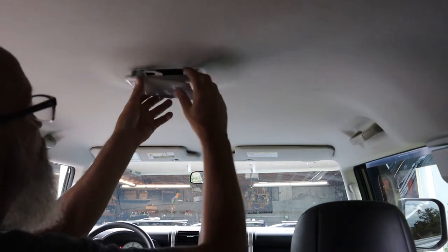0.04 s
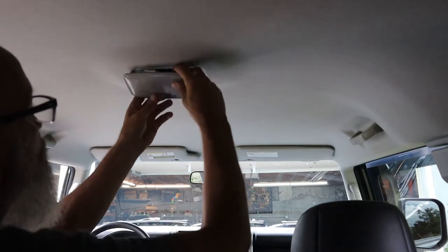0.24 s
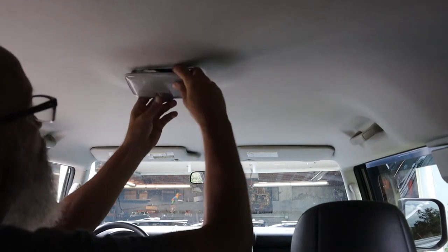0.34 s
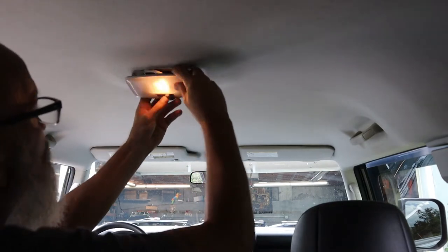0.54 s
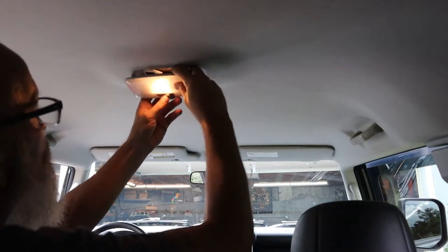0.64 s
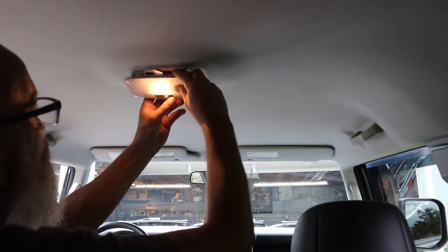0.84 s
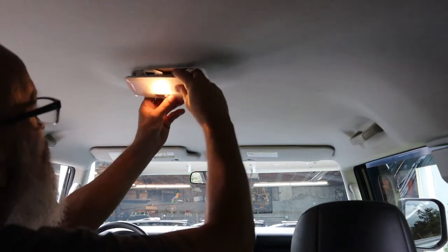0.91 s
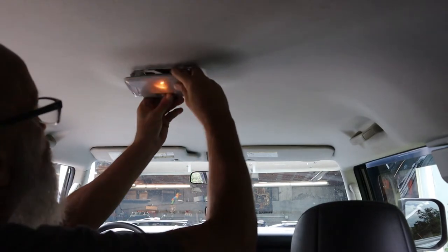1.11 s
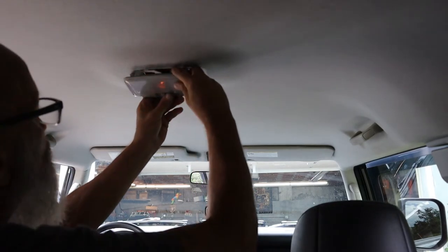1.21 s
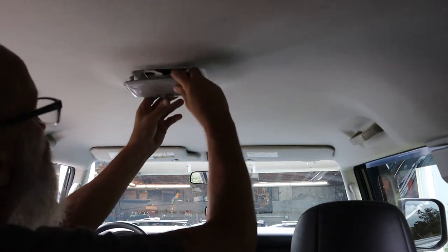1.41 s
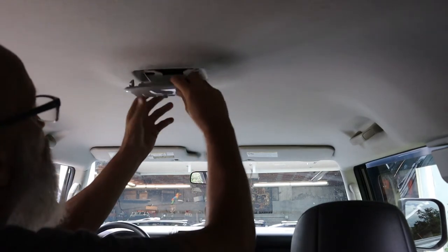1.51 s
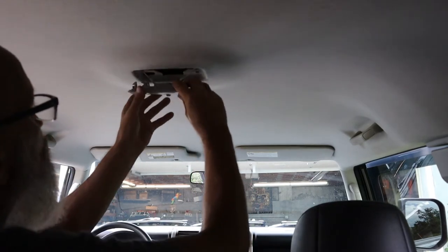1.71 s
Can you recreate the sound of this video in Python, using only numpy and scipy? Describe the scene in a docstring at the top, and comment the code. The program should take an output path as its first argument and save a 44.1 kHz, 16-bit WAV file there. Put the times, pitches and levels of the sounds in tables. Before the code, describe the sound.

One sharp snap of a plastic ceiling light catch follows faint rubbing and a soft boom from the roof panel. Light finger taps and plastic ticks come next, heard nearby in a small padded vehicle cabin with faint hum.

```python
"""A faint tick and rubbing fingers, then a soft boom: hands push a plastic dome light against the
ceiling of a parked vehicle, and the roof panel rings low. A catch scrapes over its edge and snaps home,
ringing the housing. Fingers tap and skid on the cover; plastic ticks on plastic.
The small padded cabin answers briefly, over a quiet rush and a mains hum."""
import sys
import numpy as np
from scipy import signal
from scipy.fft import rfft, irfft, next_fast_len
from scipy.io import wavfile
from scipy.ndimage import uniform_filter1d

SR = 44100
rng = np.random.default_rng(int(sys.argv[2]) if len(sys.argv) > 2 else 0)


def log_audio(samples):
    """Write samples as a 16-bit WAV file to the path given in sys.argv[1]."""
    # one column per channel
    frames = np.atleast_2d(samples).T
    # limit to full scale, then quantise
    limited = np.clip(frames, -1, 1)
    pcm = np.round(limited * 32767).astype(np.int16)
    wavfile.write(sys.argv[1], SR, pcm)


N = 77175

# steady rush [f/Hz, level/dB]
RUSH_SPECTRUM = [(12, -41), (20, -7.5), (48, 0), (88, -13), (123, -5), (154, -22.5), (300, -11), (420, -16),
                 (759, -14.5), (1120, -18.5), (5530, -28), (16000, -46)]
# mains hum [f/Hz, rms level/dB]
HUM_PARTIALS = [(119.8, -47.5), (240, -58)]
# background stereo width [f/Hz, side re mid/dB]
BACKGROUND_WIDTH = [(2000, -64), (8000, -19.5), (13000, -20), (16000, -4)]

# glass reflection [f/Hz, gain/dB]
GLASS_GAIN = [(400, -13), (800, -19), (1300, -10), (5600, -9), (9000, -19)]
# cabin tail decay [f/Hz, t60/s]
TAIL_DECAY = [(200, 0.11), (800, 0.12), (2000, 0.035), (5500, 0.055), (12000, 0.064)]
# cabin tail colour [f/Hz, level/dB]
TAIL_SPECTRUM = [(100, 15.5), (500, -11.5), (1400, 4.5), (3000, 12), (5500, 10.5), (9000, 4.5),
                 (16000, -10)]

# finger rub over time [t/s, level/dB]
RUB_ENVELOPE = [(0, -38), (.15, -71), (.26, -39), (.48, -40.5), (.72, -61), (.85, -42.5), (1.0, -61),
                (1.09, -40.5), (1.302, -59), (1.53, -65), (1.62, -48.5), (1.75, -50.5)]
# finger rub colour [f/Hz, level/dB]
RUB_SPECTRUM = [(100, 6.5), (300, -5), (550, -7.5), (800, 1.5), (1400, -13), (2200, -18), (6000, -26),
                (16000, -89)]
# fingertip skids [peak t/s, level/dB, rise/s, fall/s]
SCUFF_STROKES = [(.235, -34, 0.064, 0.087), (.465, -43, 0.071, 0.074), (.512, -42, 0.015, 0.039),
                 (1.43, -43, 0.082, 0.071)]
# skid colour [f/Hz, level/dB]
SCUFF_SPECTRUM = [(150, -9), (450, 0.5), (800, 4), (1450, -7.5), (2000, -11), (16000, -46)]
# two plastic scrapes, then the catch click's echo off the glass [peak t/s, level/dB, rise/s, fall/s]
SCRAPES_AND_ECHO = [(.207, -36.5, 0.054, 0.083), (.633, -25, 0.014, 0.023), (0.646, -32.5, 0.019, 0.037)]
# scrape and echo colour [f/Hz, level/dB]
SCRAPE_SPECTRUM = [(150, -12), (450, 3), (900, 4), (1800, -2), (3000, -2.5), (5000, -7), (8500, -18),
                   (12000, -13), (16000, -23)]
# scrape and echo stereo width [f/Hz, side re mid/dB]
SCRAPE_SPREAD = [(2000, -62), (8000, -47), (12000, -7), (16000, 2)]

# plastic-on-plastic ticks [t/s, level/dB, centre f/Hz, Q, t60/s]
TICK_EVENTS = [(0.012, -32.5, 4240, 1.7, 0.012), (0.212, -39, 4000, .7, 0.0092), (.204, -46, 12000, 2, .06),
               (0.6370, -13, 7540, 2.3, .006), (0.6373, -19.5, 3900, 1.5, 0.0095),
               (0.7698, -39, 2580, 3.7, .015), (.894, -37, 3760, 5.4, 0.017),
               (1.0361, -26.5, 4200, 2, 0.0076), (1.058, -34, 3600, 2.1, 0.011),
               (1.112, -33.5, 4950, 5.8, 0.0087), (1.180, -36.5, 5100, 0.42, .009),
               (1.239, -31, 3080, 1.5, 0.018), (1.2399, -23, 12000, 4.5, .005)]
# finger taps [t/s, level/dB, low-pass f/Hz]
TAP_EVENTS = [(0.158, -25.5, 2030), (.211, -21.5, 1490), (.229, -22, 1210), (.343, -24.5, 1520),
              (.419, -24, 1000), (.502, -18, 765), (.543, -19.5, 725), (0.5678, -18.5, 700),
              (.613, -29.5, 2000), (0.6304, -16, 2300), (.643, -25, 2000), (0.770, -18.5, 1230),
              (0.895, -24, 1200), (1.036, -23, 2500), (1.0581, -14, 960), (1.125, -23, 800),
              (1.151, -20.5, 820), (1.189, -26.5, 1700), (1.239, -29, 3000), (1.5866, -16, 830)]
# middle of the cover [f/Hz, level/dB, t60/s]
COVER_MODES = [(777, -5.5, 0.023)]
# plastic housing [f/Hz, level/dB, t60/s]
HOUSING_MODES = [(443, -26, 0.096), (550, -28.5, 0.075), (684, -12.5, 0.027), (802, -11.5, 0.031),
                 (954, -15, 0.035), (1130, -13, 0.026), (1379, -4.5, 0.017), (1488, -7, 0.013),
                 (1808, -18.5, 0.021), (2169, -16.5, 0.019), (2310, -21, 0.026), (2570, -24.5, 0.012),
                 (3540, -15.5, 0.012), (4290, -15, 0.011), (4650, -24.5, 0.01), (5555, -20.5, 0.019)]
# finger thud on the mount [f/Hz, level/dB]
THUD_SPECTRUM = [(80, -24), (180, -3.5), (300, -3), (600, 1), (1500, -16), (4000, -17.5), (8000, -75)]

# palms landing [f/Hz, level/dB]
PALM_SPECTRUM = [(60, -28), (130, 7.5), (200, 0), (300, -12.5), (450, -7), (900, -15), (2000, -31),
                 (16000, -68)]
# pushes on the roof [t/s, level/dB]
ROOF_PUSHES = [(0, -32), (0.055, -29.5), (0.2091, 0.5), (0.508, -25.5), (0.657, -16), (1.054, -31),
               (1.18, -31)]
# roof panel [f/Hz, level/dB, t60/s]
ROOF_MODES = [(67.4, 7.5, 0.15), (46.4, -4, 0.5), (73.16, -7, 0.4), (111.7, -14.5, 0.21),
              (146.7, -12.5, 0.14)]

# crack of the catch [f/Hz, level/dB]
CRACK_SPECTRUM = [(300, 2), (1000, -11), (2500, -12), (5000, 2.5), (8000, -5.5), (10000, 5.5), (14500, -1),
                  (16500, -13)]
# buzz of the loose cover [f/Hz, level/dB]
BUZZ_SPECTRUM = [(120, -13), (240, 11.5), (400, 8.5), (700, 4.5), (1400, 7), (3000, 0.5), (5600, -1.5),
                 (7000, -8), (16000, -13)]


def amp(db):
    return 10 ** (np.asarray(db) / 20)


def unit(x):
    return x / np.sqrt(np.mean(x ** 2) + 1e-20)


def along(points, hz):
    """Interpolate (f/Hz, value) points on a log axis."""
    point_hz, values = np.transpose(points)
    return np.interp(np.log(hz + 1), np.log(point_hz + 1), values)


def filtered(x, response):
    """Apply a frequency response."""
    size = next_fast_len(x.shape[-1] + SR // 4)
    gain = response(np.fft.rfftfreq(size, 1 / SR))
    return irfft(rfft(x, size) * gain, size)[..., :x.shape[-1]]


def shaped(x, spectrum):
    """Apply a (f/Hz, gain/dB) curve."""
    return filtered(x, lambda hz: amp(along(spectrum, hz)))


def lowpass(x, hz, order):
    return signal.sosfilt(signal.butter(order, min(hz, SR / 2 - 1), fs=SR, output='sos'), x)


def noise(spectrum):
    """Coloured noise, rms 1."""
    return unit(shaped(rng.standard_normal(N), spectrum))


def since(start_s):
    """Seconds since start_s, zero before."""
    return np.maximum(np.arange(N) / SR - start_s, 0)


def fade(t, attack_s, t60_s):
    """Exponential rise and decay."""
    return (1 - np.exp(-t / attack_s)) * np.exp(-np.log(1000) * t / t60_s)


def ring(modes, start_s, attack_s):
    """Struck damped modes, neighbours in opposite sense."""
    t = np.arange(int(SR * np.max(modes, axis=0)[2])) / SR
    tone = sum((-1) ** k * amp(db) * fade(t, attack_s, t60_s) * np.sin(2 * np.pi * hz * t)
               for k, (hz, db, t60_s) in enumerate(modes))
    return np.pad(tone, (round(start_s * SR), N))[:N]


def grainy_noise(spectrum, grain_db, grain_samples):
    """Noise with a flickering level, rms 1."""
    grain = unit(uniform_filter1d(rng.standard_normal(N), size=grain_samples))
    return unit(noise(spectrum) * amp(grain_db * grain))


def swells(peaks, spectrum, grain_db):
    """Grainy noise rising and dying around each peak."""
    t = np.arange(N) / SR
    envelope = np.zeros(N)
    for peak_s, db, rise_s, fall_s in peaks:
        from_peak = np.maximum((peak_s - t) / rise_s, (t - peak_s) / fall_s)
        envelope += amp(db) * np.exp(-np.log(1000) * from_peak / 2)
    return envelope * grainy_noise(spectrum, grain_db, grain_samples=50)


def background(rush_db=-43.5):
    """Steady rush plus mains hum."""
    t = np.arange(N) / SR
    hum = sum(amp(db) * np.sqrt(2) * np.sin(2 * np.pi * (hz * t + rng.random()))
              for hz, db in HUM_PARTIALS)
    return amp(rush_db) * noise(RUSH_SPECTRUM) + hum


def cabin(x, near_s=0.00796, rear_s=0.021, rear_re_near_db=-14, tail_db=-9.5):
    """Direct sound, near and rear glass reflections, short padded tail."""
    def echo(delay_s):
        return filtered(x, lambda hz: amp(along(GLASS_GAIN, hz)) * np.exp(-2j * np.pi * hz * delay_s))

    band_hz, t, bands = signal.stft(rng.standard_normal(SR // 4), SR, nperseg=128)
    bands *= fade(t, attack_s=0.0037, t60_s=along(TAIL_DECAY, band_hz)[:, None])
    bands *= amp(along(TAIL_SPECTRUM, band_hz))[:, None]
    impulse = signal.istft(bands, SR)[1]
    tail = signal.fftconvolve(x, impulse / np.linalg.norm(impulse))[:N]
    glass = echo(near_s) + amp(rear_re_near_db) * echo(rear_s)
    return x + glass + amp(tail_db) * tail


def rubbing():
    """Fingertips shift unevenly on the cover."""
    level_db = np.interp(np.arange(N) / SR, *np.transpose(RUB_ENVELOPE))
    return amp(level_db) * grainy_noise(RUB_SPECTRUM, grain_db=3, grain_samples=400)


def scuffs():
    """Skin skids on the cover, duller than plastic on plastic."""
    return swells(SCUFF_STROKES, SCUFF_SPECTRUM, grain_db=2)


def scrapes_and_echo():
    """Plastic scrapes twice; the last swell is the catch click's brief echo off the glass."""
    return swells(SCRAPES_AND_ECHO, SCRAPE_SPECTRUM, grain_db=4)


def ticks():
    """Tiny hard contacts: each a noise burst in one broad resonance."""
    out = np.zeros(N)
    for start_s, db, centre_hz, q, t60_s in TICK_EVENTS:
        def resonance(hz):
            return hz * centre_hz / (q * (centre_hz ** 2 - hz ** 2) + 1j * hz * centre_hz)

        band = unit(filtered(rng.standard_normal(N), resonance))
        out += amp(db) * band * fade(since(start_s), attack_s=0.00033, t60_s=t60_s)
    return lowpass(out, hz=13000, order=1)


def taps(detune=0.015, thud_re_tap_db=-20):
    """Soft fingers knock the cover, ring mainly the low housing modes, thud on the mount."""
    out = np.zeros(N)
    for start_s, db, lowpass_hz in TAP_EVENTS:
        # each spot rings a little differently
        modes = [(hz * (1 + detune * rng.standard_normal()), mode_db + rng.standard_normal(), t60_s)
                 for hz, mode_db, t60_s in HOUSING_MODES]
        housing = ring(modes, start_s, attack_s=0.00012)
        cover = ring(COVER_MODES, start_s, attack_s=0.0012)
        knock = lowpass(housing - cover, lowpass_hz, order=3)
        thud = noise(THUD_SPECTRUM) * fade(since(start_s), attack_s=0.00085, t60_s=0.067)
        out += amp(db) * (knock + amp(thud_re_tap_db) * thud)
    return out


def palm_thump(start_s=0.2015, level_db=-20):
    """Palms land and thump the cover against the lining."""
    return amp(level_db) * noise(PALM_SPECTRUM) * fade(since(start_s), attack_s=0.0037, t60_s=0.092)


def roof_boom():
    """Each push swells the low modes of the roof panel."""
    return sum(amp(db) * ring(ROOF_MODES, start_s, attack_s=0.053) for start_s, db in ROOF_PUSHES)


def catch_snap(start_s=0.6693, crack_db=-7, buzz_db=-17, housing_db=2):
    """The catch snaps home: it cracks, the loose cover buzzes, the housing rings."""
    t = since(start_s)
    crack = amp(crack_db) * noise(CRACK_SPECTRUM) * fade(t, attack_s=0.00088, t60_s=0.006)
    buzz = amp(buzz_db) * noise(BUZZ_SPECTRUM) * fade(t, attack_s=0.0027, t60_s=0.049)
    housing = amp(housing_db) * ring(HOUSING_MODES, start_s, attack_s=0.00032)
    return crack + buzz + housing


def scene():
    """Centred mix; only the top treble spreads."""
    contacts = catch_snap() + taps() + ticks() + scrapes_and_echo() + scuffs() + palm_thump()
    mid = cabin(contacts) + rubbing() + roof_boom() + background()
    side = shaped(scrapes_and_echo(), SCRAPE_SPREAD) + shaped(background(), BACKGROUND_WIDTH)
    return np.array([mid + side, mid - side])


def record(dry):
    """Steep low-pass on the top treble."""
    cutoff_hz = 15700
    return filtered(dry, lambda hz: 1 / np.sqrt(1 + (hz / cutoff_hz) ** 120))


dry = scene()
out = record(dry)
log_audio(out)
```